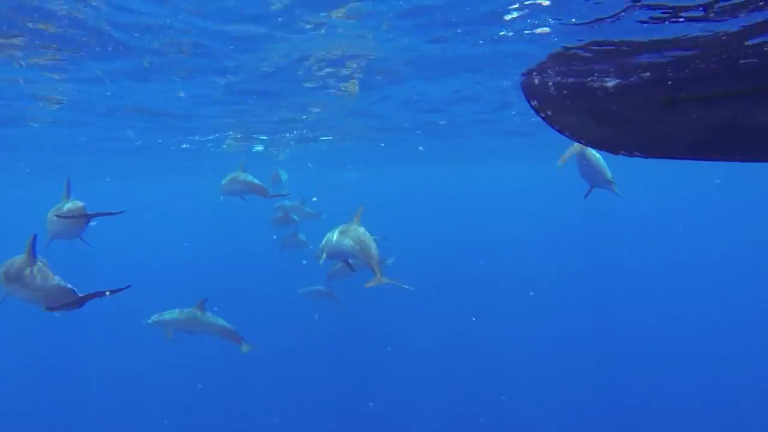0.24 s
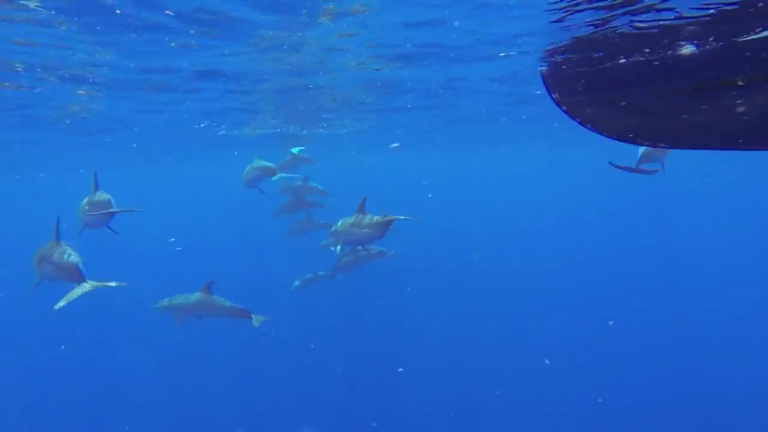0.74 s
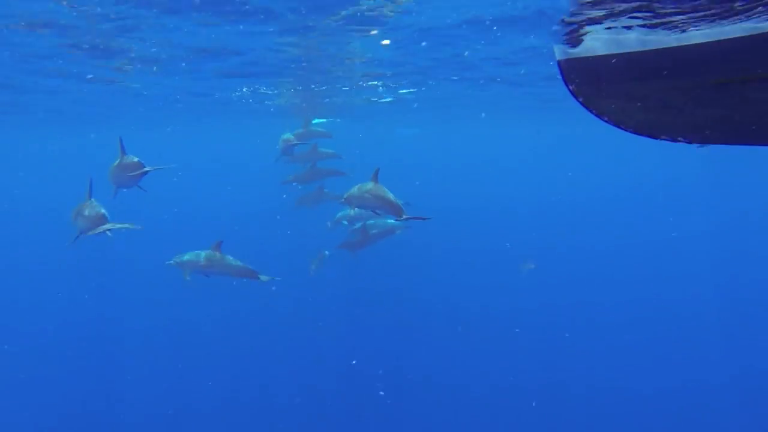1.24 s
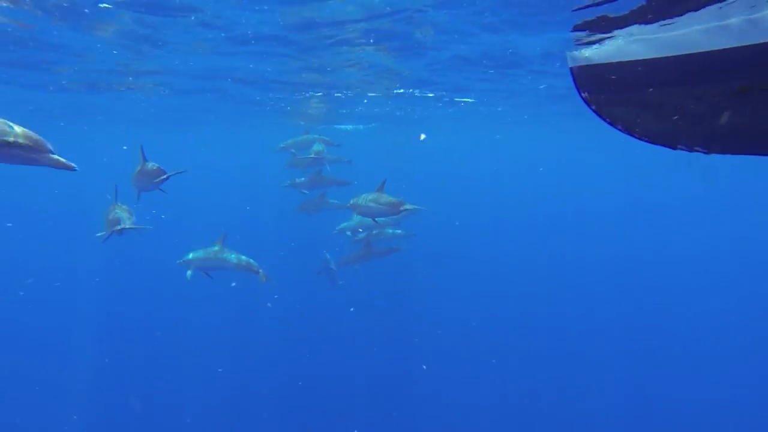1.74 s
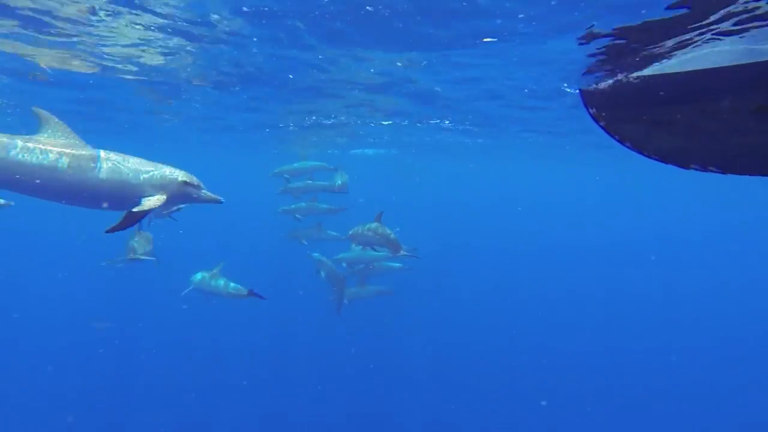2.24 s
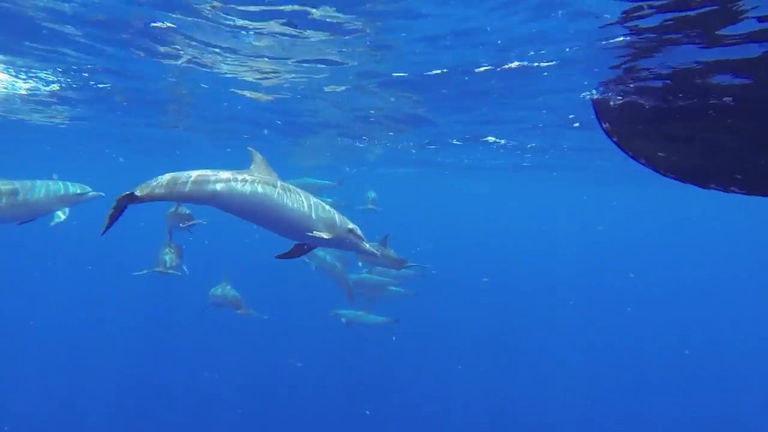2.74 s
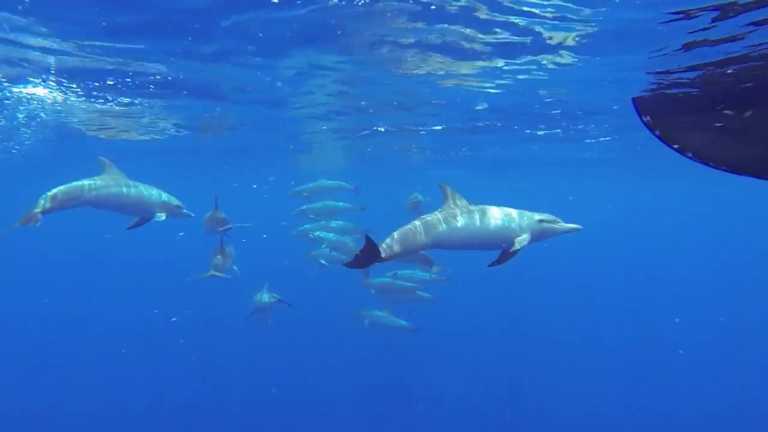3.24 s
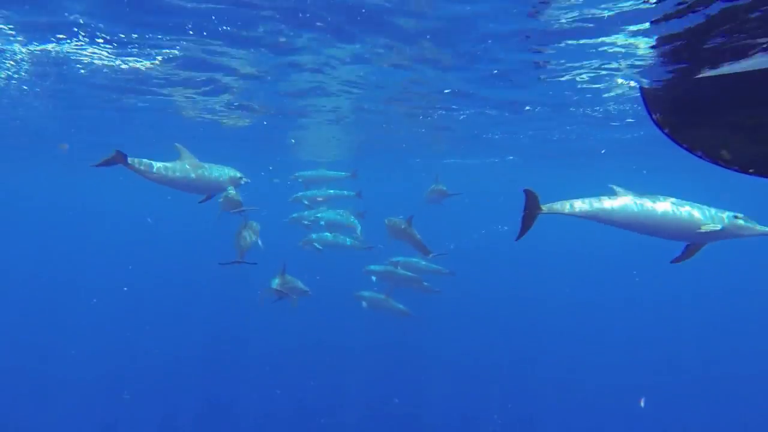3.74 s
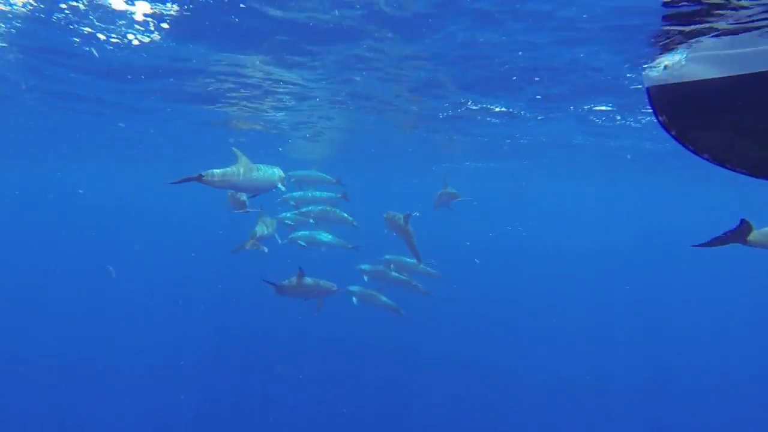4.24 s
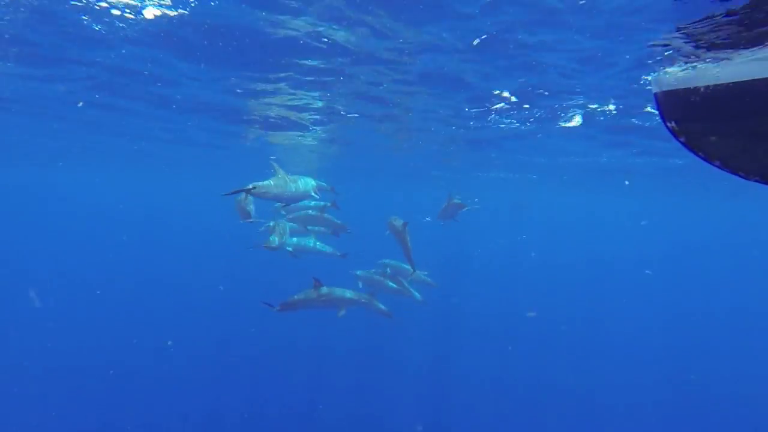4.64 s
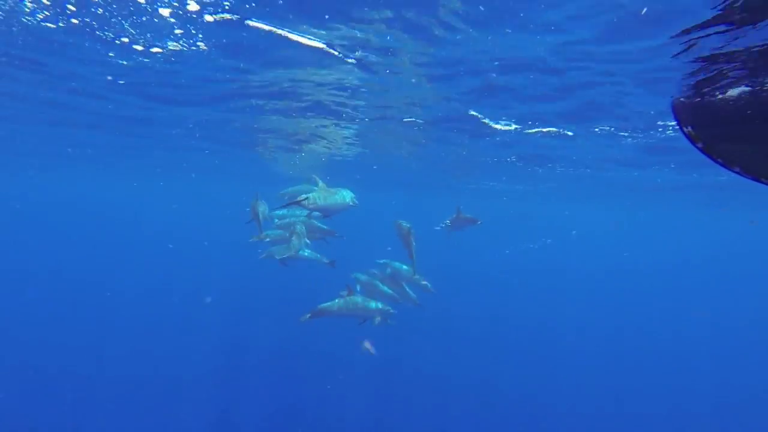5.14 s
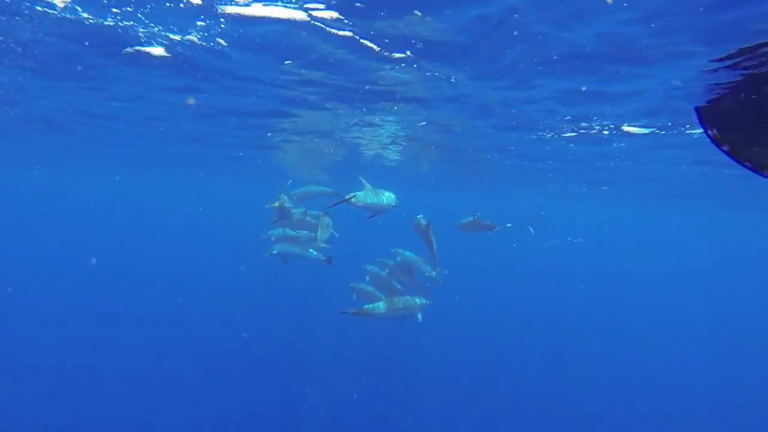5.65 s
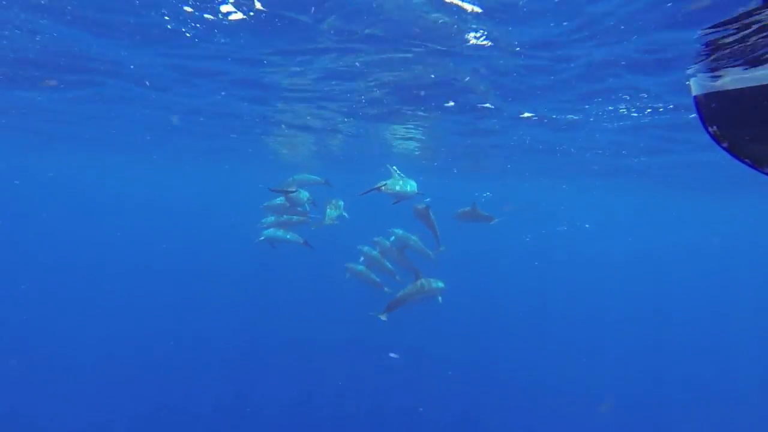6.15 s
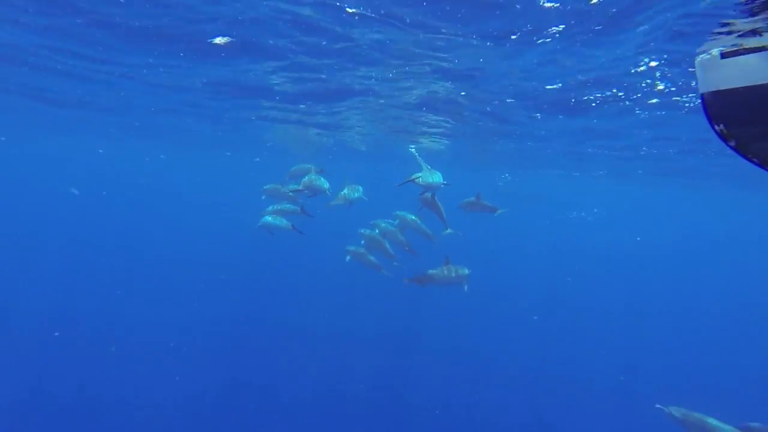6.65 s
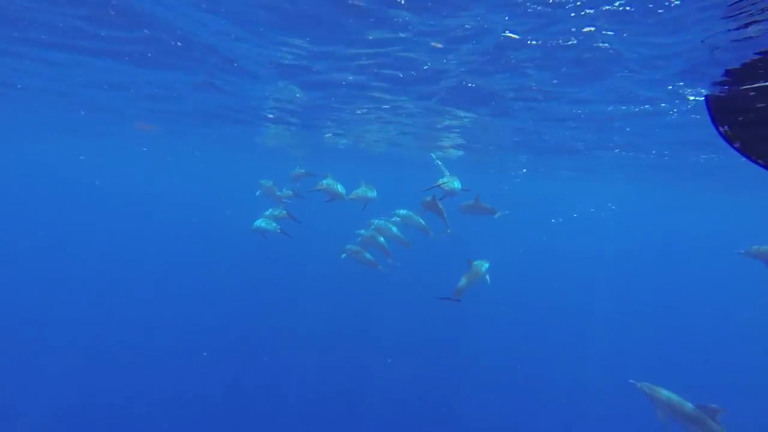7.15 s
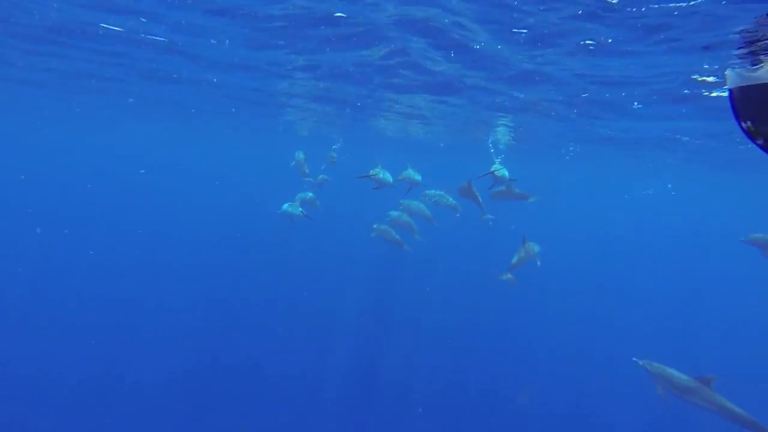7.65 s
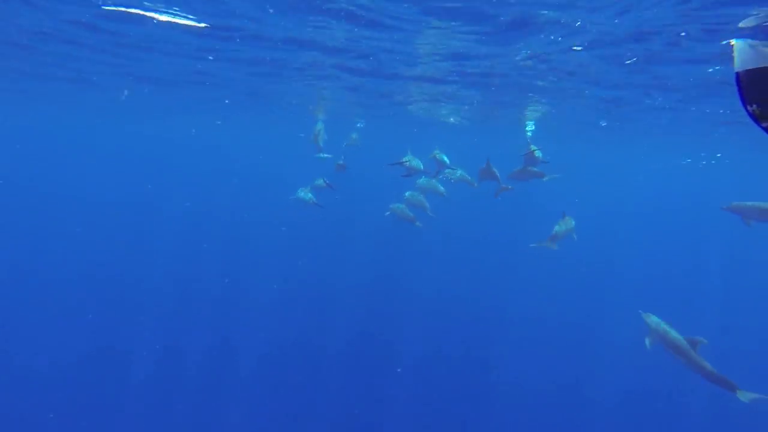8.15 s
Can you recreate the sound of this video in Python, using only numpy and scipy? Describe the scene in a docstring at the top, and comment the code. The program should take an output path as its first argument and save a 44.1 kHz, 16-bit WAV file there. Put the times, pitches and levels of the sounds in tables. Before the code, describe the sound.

A pod of dolphins passes a submerged microphone whose housing muffles and rings. Brief high chirps come first, then rapid ticking and a rasping buzz, cut by a loud thump and bubbles. Slower clicks follow, then a quieter stretch with sparse whistles. Several wavering whistles and a nasal squawk cluster together before waves slap the housing with bubbles and a run of dry raps.

```python
"""A high whistle rises over the low rumble of moving water: dolphins pass an underwater camera in a sealed housing.
Whistles are wavering sines with overtones, the squawk is a band of pulse overtones; sonar clicks and buzz
are impulses through housing resonances. Waves thump and knock the housing (filtered pushes, noise bursts).
Bubbles and froth are decaying tones, the water is coloured noise, and the camera adds a thin whine."""
import sys
import numpy as np
from scipy import signal
from scipy.fft import rfft, irfft, next_fast_len
from scipy.io import wavfile
from scipy.ndimage import uniform_filter1d, map_coordinates

SR = 44100
rng = np.random.default_rng(int(sys.argv[2]) if len(sys.argv) > 2 else 0)


def store_wav(level_fs):
    """Save 16-bit WAV to argv[1]."""
    pcm = np.round(np.clip(np.atleast_2d(level_fs), -1, 1) * 32767)
    wavfile.write(sys.argv[1], SR, pcm.T.astype(np.int16))


N = 370440

# ringing resonances of the housing: centre_hz, width_hz, relative_db
HOUSING_RING = [(1552, 200, -2), (2160, 123, 0.5), (2800, 1080, -14)]


def amp(db):
    """Amplitude ratio of a level in dB."""
    return 10 ** (np.asarray(db) / 20)


def unit(x):
    """x scaled to rms 1."""
    return x / np.sqrt(np.mean(x ** 2) + 1e-20)


def curves(rows):
    """One value per sample for each column after the time."""
    s, *cols = np.transpose(rows)
    return [np.interp(np.arange(N) / SR, s, c) for c in cols]


def wobble(knots_per_s, count=N):
    """Smooth random curve through normally distributed knots."""
    knots = rng.standard_normal(int(count * knots_per_s / SR) + 4)
    return map_coordinates(knots, [np.arange(count) * knots_per_s / SR])


def filtered(x, response):
    """x times a complex response of frequency in Hz."""
    m = next_fast_len(N + SR // 2)
    return irfft(rfft(x, m) * response(np.fft.rfftfreq(m, 1 / SR)), m)[:N]


def resonate(x, modes):
    """x through parallel resonances of alternating sign; a unit impulse comes out with peak 1."""
    def body(f):
        total = 0
        for k, (centre_hz, width_hz, db) in enumerate(modes):
            damping = 1j * f * width_hz
            total = total + (-1) ** k * amp(db) * damping / (centre_hz * centre_hz - f * f + damping)
        return total
    return filtered(x, body) / np.abs(filtered(np.arange(N) == 0, body)).max()


def noise(spectrum):
    """Noise of rms 1, coloured by (Hz, dB) points joined on a log frequency axis."""
    f, db = np.transpose(spectrum)
    colour = lambda hz: amp(np.interp(np.log(hz + 1), np.log(f + 1), db))
    return unit(filtered(rng.standard_normal(N), colour))


def impulses(times_s, db):
    """A line of single-sample pulses."""
    return np.bincount(np.round(np.asarray(times_s) * SR).astype(int), amp(db), N)[:N]


def whistles():
    """Wavering, slightly hoarse tones with overtones, smeared by the answer from the surface."""
    # one whistle, or a strong overtone line of one, per row: relative_level_db, contour (time_s, pitch_hz)
    contours = [ (-58.5, [(0.0, 9900), (0.09, 13200)]), (-62, [(0.19, 3900), (0.38, 3960)]),
                (-50, [(0.25, 2180), (0.265, 3130), (0.29, 3650)]), (-56.5, [(1.94, 4050), (2.0, 3970)]),
                (-78, [(2.29, 10200), (2.41, 14700), (2.46, 14800), (2.53, 11800), (2.63, 7700)]),
                (-73, [(4.42, 4150), (4.465, 4150), (4.475, 5100), (4.52, 5950)]), (-71, [(6.0, 15500),
                (6.17, 13500), (6.4, 13600)]), (-67.5, [(6.72, 9200), (6.84, 8000), (6.96, 8930)]),
                (-60.5, [(0.485, 4820), (0.525, 5340)]), (-59, [(2.1, 3940), (2.19, 4250)]),
                (-65, [(2.19, 5000), (2.3, 6020), (2.315, 7050), (2.4, 7500), (2.43, 8100)]),
                (-71, [(3.19, 4700), (3.23, 3980), (3.47, 3900)]), (-64, [(3.66, 2930), (3.78, 3290)]),
                (-59.5, [(4.1, 3500), (4.16, 3310), (4.36, 3436)]), (-68.5, [(5.22, 4374), (5.62, 4860)]),
                (-56.5, [(5.28, 2250), (5.315, 2300)]), (-61, [(5.785, 6900), (5.83, 5000)]),
                (-63.5, [(5.72, 14200), (5.76, 12000), (5.83, 10100), (5.95, 7570), (6.04, 7050),
                (6.12, 8020), (6.25, 7600), (6.36, 6480), (6.62, 6880), (7.15, 7460)]), (-66, [(6.06, 3340),
                (6.45, 3500)]), (-72.5, [(6.16, 3500), (6.3, 3790), (6.68, 3820)]), (-68, [(6.4, 1804),
                (6.62, 1666)]), (-69, [(6.06, 9650), (6.3, 9500), (6.41, 8650)]), (-72, [(6.17, 5100),
                (6.35, 5660), (6.6, 4980)]), (-58.5, [(6.41, 7700), (6.6, 5630), (6.74, 4900),
                (6.78, 5600)]), (-63, [(6.13, 6690), (6.72, 6560), (6.84, 6180), (6.95, 6220), (7.2, 5050),
                (7.26, 5200)]), (-58, [(6.62, 2800), (6.72, 2296), (6.84, 2017), (7.0, 2310),
                (7.04, 3340)]), (-70, [(7.04, 3180), (7.25, 3244)]), (-56, [(7.25, 3300), (7.29, 2610),
                (7.395, 1596)]), (-69, [(7.97, 5530), (8.03, 8170), (8.22, 7980), (8.3, 7200),
                (8.5, 6100)]), (-61, [(8.07, 4980), (8.15, 5940), (8.7, 6830)]), ]
    # the whistle that turns raspy: relative_level_db, contour (time_s, pitch_hz)
    raspy = (-62.5, [(5.4, 5210), (5.5, 6200), (5.62, 6480), (5.75, 5680)])
    rasp_start_s, rasp_end_s, flutter_hz, depth_rad = 5.49, 5.72, 300, 2.2
    overtone_loss_db_per_khz = 4.5  # per overtone and kHz of pitch: low whistles are the richest
    out = np.zeros(N)
    for order, (db, rows) in enumerate([raspy, *contours]):
        s, hz = np.transpose(rows)
        i = np.arange(round(s[0] * SR), min(round(s[-1] * SR), N))
        pitch_hz = uniform_filter1d(np.interp(i / SR, s, hz), size=600)
        pitch_hz = pitch_hz * (1 + 0.005 * wobble(25, count=len(i)))
        phase = 2 * np.pi * np.cumsum(pitch_hz) / SR
        if order == 0:  # raspy: fast, uneven phase flutter
            progress = np.clip((i / SR - rasp_start_s) / (rasp_end_s - rasp_start_s), 0, 1)
            arch = np.sin(np.pi * progress) ** .5
            rate_hz = flutter_hz * arch * amp(wobble(flutter_hz, count=len(i)))
            phase += depth_rad * arch * np.sin(2 * np.pi * np.cumsum(rate_hz) / SR)
        fade = np.clip(np.minimum(i - i[0], i[-1] - i) / (.006 * SR), 0, 1)
        # slow and fast level flutter
        level = amp(db + 1.93 * wobble(30.24, count=len(i)) + 2.35 * wobble(400, count=len(i)))
        tone = np.zeros(len(i))
        for k in range(5):
            partial_amp = amp(-overtone_loss_db_per_khz * pitch_hz / 1000 * k)
            audible = pitch_hz * (k + 1) < SR / 2
            tone += partial_amp * audible * np.sin((k + 1) * phase)
        out[i] += fade * level * tone
    tail_t60_s = 0.099
    tail = rng.standard_normal(SR // 8) * amp(-60 * np.arange(SR // 8) / SR / tail_t60_s)
    wet = out + amp(-1.0) * signal.fftconvolve(out, tail / np.linalg.norm(tail))[:N]
    return filtered(wet, lambda hz: 1 / (1 + (hz / 11500) ** 4))  # the housing dulls the top


def beat(rows):
    """Click times in s: a click whenever the integrated pace passes a whole number."""
    t = np.arange(rows[0][0], rows[-1][0], 1 / SR)
    count = np.floor(np.cumsum(np.interp(t, *np.transpose(rows)[:2])) / SR)
    return t[np.flatnonzero(np.diff(count, prepend=-1))]


def clicks():
    """Each click is far shorter than the housing's response, so one hears the housing ring and tick."""
    # sonar train paces, first click at the first row: time_s, clicks_per_s
    search_pace = [(.7388, 41.1), (.946, 62.5), (1.111, 126.3), (1.263, 132.3), (1.482, 44.2),
                   (1.819, 15.3), (1.991, 62.2), (2.015, 93.3), (2.12, 88.3)]
    scan_pace = [(1.9935, 18.4), (2.288, 13.4), (2.354, 18.2), (2.851, 22.3), (2.951, 36.5), (3.021, 34.4),
                 (3.277, 50), (3.671, 17.2), (3.71, 28)]
    # their loudness: time_s, relative_ring_db, relative_tick_db
    search_level = [(.74, -40.5, -63), (1.36, -34.5, -66), (1.57, -33.5, -56), (2.12, -35, -67)]
    scan_level = [(2.0, -28, -69), (2.6, -38, -69), (3.7, -39.5, -74.5)]
    # fast buzz: time_s, clicks_per_s, relative_ring_db
    buzz_rows = [(.36, 100, -56), (.5, 138, -44), (.8, 215, -42.5), (1.15, 286, -39.5), (1.6, 230, -41),
                 (2.1, 162, -46.5)]
    # single clicks, those at 1.263 s and 1.35 s being bright cracks that come with bubbles: time_s,
    # relative_tick_db
    single_clicks = [(0.076, -61.5), (0.4022, -61), (0.8877, -56), (1.263, -46.5), (1.35, -55),
                     (2.6812, -63), (3.4463, -59), (4.055, -57), (4.195, -63), (4.7484, -61.5),
                     (4.8567, -57.5), (4.994, -63.5), (5.192, -65), (5.434, -63.5)]
    # bright housing resonances: centre_hz, width_hz, relative_db
    tick_modes = [(3500, 300, 3), (5200, 120, 4), (6200, 300, 1.5), (7700, 370, -2.5), (9620, 230, -4.5),
                  (12800, 630, -12)]
    buzz_times = beat(buzz_rows)
    buzz_times += .00004 * rng.standard_normal(len(buzz_times))  # slightly uneven beat, s
    buzz_level = [(s, db, db - 30.5) for s, _, db in buzz_rows]
    trains = [  # times, loudness, scatter in dB
        (beat(search_pace), search_level, 1.5),
        (beat(scan_pace), scan_level, 1.5),
        (buzz_times, buzz_level, 1.2),
    ]
    low, high = np.zeros(N), np.zeros(N)
    for times, level, scatter_db in trains:
        s, ring_db, tick_db = np.transpose(level)
        scatter = scatter_db * rng.standard_normal((len(times), 2))
        low += impulses(times, np.interp(times, s, ring_db) + scatter[:, 0])
        high += impulses(times, np.interp(times, s, tick_db) + scatter[:, 1])
    s, db = np.transpose(single_clicks)
    low += impulses(s, db + 29.0)
    high += impulses(s, db)
    # the click arrives as a burst of under a millisecond
    burst = high + uniform_filter1d(high, size=24) * 3 * rng.standard_normal(N)
    ringing = filtered(resonate(low, HOUSING_RING), lambda hz: 1 / (1 + 1j * hz / 3000) ** 2)
    return ringing + amp(14.0) * resonate(burst, tick_modes)


def squawk():
    """Overtones of a fast pulse rate, heard only inside a moving band and a weaker fixed one below."""
    # pulses fast enough to have a pitch: time_s, pulses_per_s, relative_level_db, loudest_hz
    pulse_rows = [(5.85, 256, -58, 2340), (5.95, 340, -53.5, 2270), (6.0, 384, -54, 2250),
                  (6.03, 284, -57.5, 2150), (6.22, 306, -60, 2650), (6.27, 420, -79, 2850)]
    width_hz = 420
    low_hz, low_width_hz, low_db = 1380, 120, -5
    rate_hz, db, top_hz = curves(pulse_rows)
    phase = 2 * np.pi * np.cumsum(rate_hz) / SR

    def band(hz):
        upper = np.exp(-((hz - top_hz) / width_hz) ** 2)
        return upper + amp(low_db) * np.exp(-((hz - low_hz) / low_width_hz) ** 2)

    stack = np.zeros(N)
    for k in range(3, 13):
        flutter = amp(4.1 * wobble(25) + 3.3 * wobble(160))
        stack += band(k * rate_hz) * flutter * np.sin(k * phase)
    t = np.arange(N) / SR
    gate = 1. * (t > pulse_rows[0][0]) * (t < pulse_rows[-1][0])
    return amp(db) * stack * uniform_filter1d(gate, size=600)


def ring(t, db, hz, t60_s, attack_s):
    """A bubble: a tone that swells as the neck closes, then dies while its pitch creeps up."""
    t = np.maximum(t, 0)
    tone = np.sin(2 * np.pi * hz * t * (1 + .03 * t / t60_s))
    return amp(db - 60 * t / t60_s) * (1 - np.exp(-(t / attack_s) ** 2)) * tone


def bubbles():
    """Each bubble beats against a weaker twin and pinches off with a puff of noise around its pitch."""
    # ringing bubbles: start_s, relative_level_db, pitch_hz
    bubble_rows = [(0.717, -43, 552), (1.244, -22.5, 920), (1.261, -11, 565), (1.281, -38.5, 4980),
                   (1.343, -9.5, 921), (1.379, -32, 1150), (1.436, -17.5, 1235), (1.522, -41.5, 4680),
                   (1.994, -34, 2165), (2.929, -38, 2194), (3.293, -49, 3950), (3.378, -45, 2700),
                   (3.963, -50.5, 3580), (3.991, -43.5, 2230), (4.241, -48.5, 1490), (4.045, -42, 1854),
                   (4.093, -42.5, 1416), (4.322, -33, 1717), (5.616, -51, 2280), (5.709, -28, 739),
                   (7.723, -33.5, 1603), (7.737, -44.5, 5200), (7.759, -47, 2700), (7.782, -18, 1480),
                   (7.782, -22.5, 988), (7.819, -22.5, 1555), (7.832, -37, 2210), (7.841, -50, 5100),
                   (7.899, -49, 4290), (7.883, -23, 1014), (7.886, -24.5, 2150), (7.906, -22.5, 1302),
                   (7.927, -25, 1185), (8.079, -44.5, 1367), (8.154, -41.5, 1566), (8.235, -42, 3860),
                   (8.305, -38, 1920), (8.324, -41, 3580)]
    t60_at_1khz_s, t60_slope = 0.052, 0.6  # smaller, higher bubbles die sooner
    out, t = np.zeros(N + SR), np.arange(SR // 4) / SR
    for s, db, hz in bubble_rows:
        t60_s = t60_at_1khz_s * (1000 / hz) ** t60_slope
        swell_s = 5 / hz  # a few cycles
        main = ring(t, db + 14.0, hz, t60_s, swell_s)
        twin = ring(t, db - 3.0, .945 * hz, 2.87 * t60_s, swell_s / 2)
        around = signal.butter(4, [hz / 3, 1.5 * hz], "band", fs=SR, output="sos")
        puff_level = amp(0.74 * db - 8 - 60 * t / (4.1 * t60_s))
        puff = signal.sosfilt(around, rng.standard_normal(len(t))) * puff_level
        flutter = amp(1.5 * wobble(130, count=len(t)))  # stirred water
        out[round(s * SR):][:len(t)] += (main + twin) * flutter + puff
    return out[:N]


def froth():
    """Swarms of small short-lived bubbles crackle where a wave breaks and set the housing ringing."""
    # froth: start_s, end_s, relative_level_db, lowest_hz
    splash_rows = [(1.967, 2.025, -28, 694), (3.95, 4.451, -44, 720), (7.786, 7.967, -29.5, 960)]
    out, t = np.zeros(N + SR), np.arange(SR // 30) / SR
    for start, end, db, low_hz in splash_rows:
        count = round(400 * (end - start))  # 400 bubbles per s
        when, pitch, softness = rng.random((count, 3)).T[..., None]
        hz = low_hz * np.exp(1.25 * pitch)
        grain_db = db - 4 * np.log(softness + .04) - 6 * pitch  # few loud, high ones weaker
        grains = ring(t, grain_db, hz, 11 / hz, 1.5 / hz)
        at = np.round((start + (end - start) * when) * SR).astype(int) + np.arange(len(t))
        out += np.bincount(at.ravel(), grains.ravel(), len(out))
    return out[:N] + amp(-21) * resonate(out[:N], HOUSING_RING)


def thumps():
    """A soft push a few milliseconds long shakes the housing's low modes."""
    # waves slapping the housing: time_s, relative_level_db
    slaps = [(0.613, -24), (1.063, -31), (1.153, -15.5), (1.219, -25), (3.942, -27), (6.981, -35),
             (8.041, -14), (8.337, -18)]
    # low modes of the housing: centre_hz, width_hz, relative_db
    slosh_modes = [(40.7, 10.5, -4.5), (54.9, 5.5, 4), (106, 33, -11), (242.4, 23, -6)]
    s, db = np.transpose(slaps)
    pulses = impulses(s + 0.00325, db + 6.0)
    push = filtered(pulses, lambda hz: -1 / (1 + 1j * hz / 500) ** 4)
    return resonate(push, slosh_modes) + 0.13 * push / np.abs(push).max()


def knocks():
    """Dry, toneless raps: a burst of noise that dies within a few hundredths of a second."""
    # water knocking on the housing shell: time_s, relative_level_db
    raps = [(1.16, -8), (3.289, -31), (3.761, -25.5), (3.967, -24), (4.389, -29.5), (5.483, -26.5),
            (7.785, -14), (7.886, -16.5), (8.166, -16), (8.188, -18), (8.212, -15), (8.233, -16.5),
            (8.264, -12.5), (8.34, -12), (8.37, -16)]
    t60_s = .05
    s, db = np.transpose(raps)
    fall = amp(-60 * np.arange(SR // 10) / SR / t60_s)
    decay = signal.fftconvolve(impulses(s, db), fall)[:N]

    def shell(hz):
        band = 4j * hz / 350 / (1 + 1j * hz / 350) ** 2
        return band / (1 + 1j * hz / 1400) ** 3

    return filtered(decay * rng.standard_normal(N), shell)


def water():
    """Sloshing rumble that swells in lumps, over the steady wash of the sea."""
    # moving water: time_s, rumble_db
    surge = [(0.0, -30), (1.03, -27), (1.26, -13), (1.4, -27.5), (6.5, -32), (7.72, -31), (8.02, -20.5),
             (8.4, -15)]
    # rumble spectrum: frequency_hz, relative_db_per_hz
    rumble_spectrum = [(15, -2), (38, 11.5), (62, 6), (80, -7.5), (115, -21), (240, -25.5), (400, -73)]
    # wash spectrum: frequency_hz, relative_db_per_hz
    sea_spectrum = [(200, -7.5), (560, 3.5), (750, -3.5), (1550, -7), (2200, -8), (3300, -14),
                    (4200, -20.5), (5200, -17.5), (8500, -28), (14000, -31)]
    lumps = amp(2.1 * wobble(4.6))
    rumble = amp(curves(surge)[0]) * unit(lumps * noise(rumble_spectrum))
    ripple = amp(1.5 * wobble(90))
    return rumble + amp(-58.0) * noise(sea_spectrum) * ripple


def scene():
    """Sum of all sources, one channel."""
    animals = whistles() + clicks() + squawk()
    sea = bubbles() + froth() + thumps() + knocks() + water()
    return (animals + sea)[None]


def record(dry):
    """The camera adds a faint whine and keeps nothing above its band limit."""
    whine_hz, whine_rms_db, top_hz = 12127, -88, 14200
    whine = amp(whine_rms_db) * np.sqrt(2) * np.sin(2 * np.pi * whine_hz * np.arange(N) / SR)
    return filtered(dry[0] + whine, lambda hz: hz < top_hz)[None]


dry = scene()
out = record(dry)
store_wav(out)
```